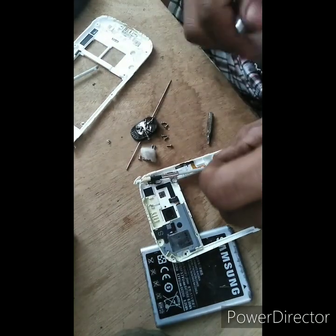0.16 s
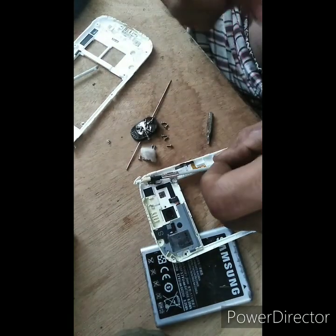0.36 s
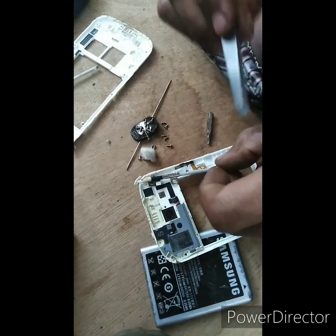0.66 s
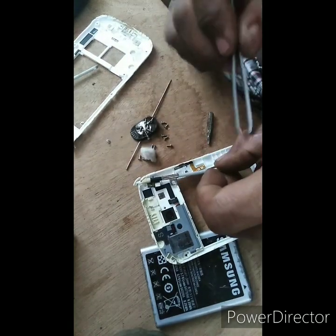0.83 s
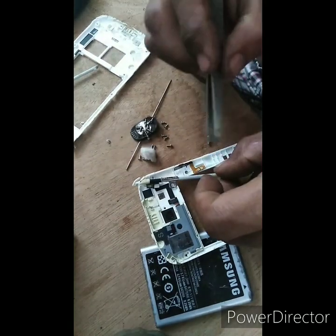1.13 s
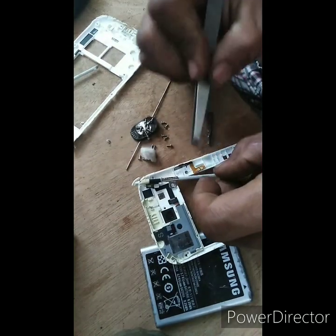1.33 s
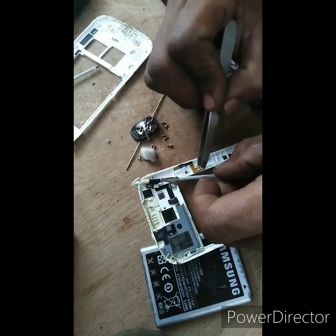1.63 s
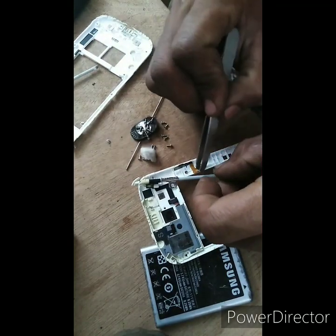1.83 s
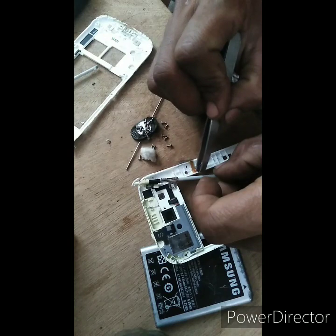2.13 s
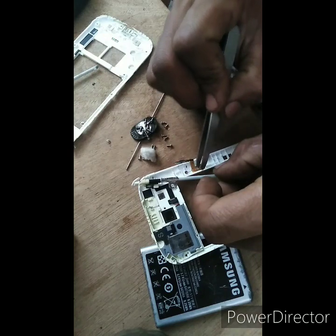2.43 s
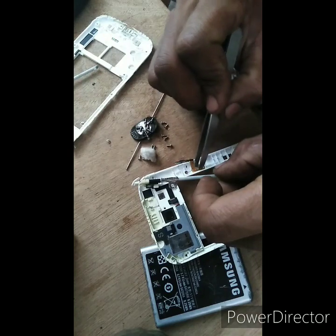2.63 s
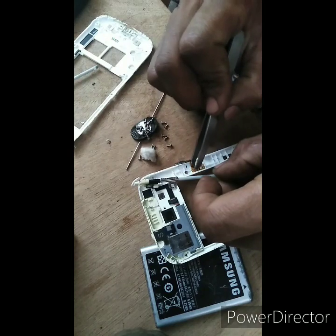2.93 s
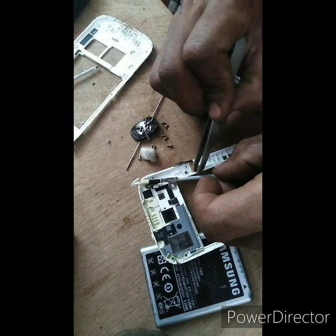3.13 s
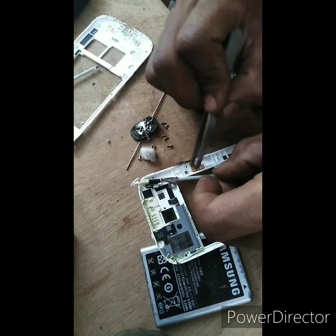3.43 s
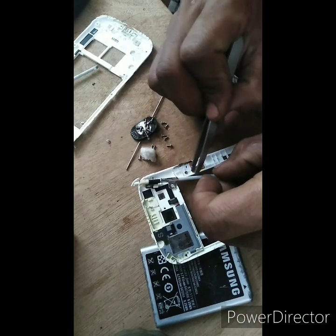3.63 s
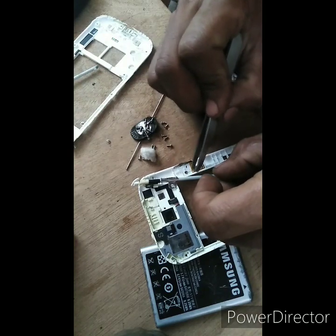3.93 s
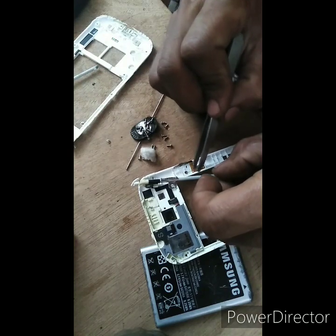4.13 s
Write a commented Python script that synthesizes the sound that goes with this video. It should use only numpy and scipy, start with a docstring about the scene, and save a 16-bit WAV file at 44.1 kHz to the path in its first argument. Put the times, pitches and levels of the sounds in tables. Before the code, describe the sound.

Small clicks, dry scrapes and a few sharp snaps of delicate phone repair in a bare room, with soft table bumps and low hum.

```python
"""In a bare, reverberant room, steel tweezers pick at small parts in a plastic phone frame on a wooden table.
Taps, scrapes and rubs are runs of tiny slips exciting small parts, plastic body and steel tips; shoves of
the frame shake the table. Short squeaks, creaks and ringing patches are narrow bands of noise; snaps are
a noise crack with decaying modes. Underneath, bumps of the hands start low rumble, fingers rub faintly, and
a motor hums with a quick throb made by neighbouring orders, over mains hum, moving air and a faint hiss."""
import sys
import numpy as np
from scipy import signal
from scipy.fft import rfft, irfft
from scipy.io import wavfile
from scipy.ndimage import uniform_filter1d

SR = 44100
rng = np.random.default_rng(int(sys.argv[2]) if len(sys.argv) > 2 else 0)


def wav_out(sig):
    """Save sig, one row per channel (or a flat mono array), as 16-bit PCM at SR to the path in sys.argv[1]."""
    wavfile.write(sys.argv[1], SR, np.round(np.clip(np.atleast_2d(sig).T, -1, 1) * 32767).astype(np.int16))


N = 187777
TIME = np.arange(N) / SR   # seconds

# Contact levels are drives, before the gains set in contacts() and the response of the room.
# Light touches of the tips. Each row: start in seconds, ring drive in dB,
# plastic body relative to it in dB, sizzle of the steel relative to it in dB.
TAPS = [(0.087, -54, -11, -0.5), (0.326, -55, -10, -3), (1.038, -52.5, -8.5, -12),
        (1.399, -51.5, -21, -9.5), (1.433, -47, -11, -8), (1.52, -57, -12, -10), (1.762, -56, -5, -3.5),
        (2.0234, -41.5, -20, -5.5), (2.143, -50.5, -25, -9.5), (2.2096, -42, -11.5, -9.5),
        (2.837, -52, -9, -15), (2.975, -49, -18, -1.5), (3.618, -51, -5, -14.5), (4.1695, -46, -10.5, -11),
        (4.201, -47.5, -9.5, -5)]
# The tips or the frame dragging. Each row: start in seconds, ring drive in dB, body drive in dB,
# sizzle drive in dB, length in seconds.
SCRAPES = [(0.0014, -58, -60.5, -68, 0.006), (0.4867, -33.5, -27, -45.5, 0.023),
           (0.588, -29.5, -26.5, -40.5, 0.013), (0.6235, -33, -28.5, -44, 0.028),
           (2.0607, -39.5, -55, -47, 0.025), (2.241, -50, -54, -55, 0.06),
           (2.336, -42.5, -55.5, -50.5, 0.018), (2.3575, -33, -44.5, -41.5, 0.022),
           (2.534, -39.5, -52, -48.5, 0.037), (2.560, -38.5, -40, -49.5, 0.022),
           (3.679, -37, -45, -48, 0.018), (3.72, -46.5, -59, -48, 0.062), (3.8616, -47, -58, -63, 0.017)]
# Fingers on smooth plastic. Each row: start in seconds, sizzle drive in dB, length in seconds.
RUBS = [(0.18, -55.5, 0.11), (0.875, -70, 0.071), (0.944, -63, 0.031), (1.9, -70, 0.018),
        (1.945, -72, 0.025), (3.132, -55, 0.085), (3.322, -52, 0.038)]
# The frame judders over the table. Each row: start in seconds, drive in dB, length in seconds.
SHOVES = [(0.492, -38, 0.016), (0.593, -37, 0.084), (0.642, -40, 0.062), (0.872, -61.5, 0.027)]
# Short pitched squeaks, creaks and ringing patches. Each row: start in seconds, centre in Hz, level in dB,
# held length in seconds, left over right in dB.
SQUEAKS = [(0.159, 992, -50.5, 0.046, -2.5), (0.326, 2280, -57, 0.018, 17),
           (0.327, 559, -59.5, 0.0097, -14), (1.055, 1303, -64, 0.015, -7), (1.148, 1117, -60, 0.0064, 19),
           (1.158, 614, -60.5, 0.0063, -29), (1.404, 2287, -61.5, 0.006, 15), (2.358, 1080, -45, 0.0062, 8),
           (2.562, 686, -62, 0.018, -27), (2.831, 3465, -67, 0.076, 24), (2.841, 1002, -57, 0.14, 2.5),
           (2.877, 1550, -61, 0.051, -13), (3.246, 1192, -57.5, 0.0026, 22), (3.339, 2097, -75, 0.055, 2),
           (3.464, 655, -68, 0.012, -13), (3.674, 938, -53.5, 0.0044, -10)]
# A part snaps into its seat. Each row: start in seconds, relative crack level in dB,
# impulse on the frame in dB, impulse on the table in dB.
SNAPS = [(0.4987, -29, -55, -68), (0.591, -27, -40, -68), (1.436, -31.5, -81, -62), (2.2888, -23, -44, -42),
         (3.748, -23.5, -33, -36.5)]
# Normal modes of the frame. Each row: frequency in Hz, gain in dB, t60 in seconds.
FRAME_MODES = [(1100, -5, 0.15), (1210, -19, 0.12)]
# Normal modes of the table under it. Each row: frequency in Hz, gain in dB, t60 in seconds.
TABLE_MODES = [(312, -4.5, 0.15), (356.5, 2, 0.11)]
# Colour of plastic and steel in contact. Each row: frequency in Hz, relative density in dB per Hz.
CONTACT_COLOUR = [(88, -35), (150, 10), (228, 25), (261, -11), (348, 12.5), (421, -33.5), (482, -16),
                  (606, -3), (1120, 12), (1610, 0.5), (2270, 2.5), (2850, 2.5), (3590, -1), (11500, -7.5),
                  (14500, -9.5)]
# Colour of the table top. Each row: frequency in Hz, relative density in dB per Hz.
TABLE_COLOUR = [(150, 0), (195, -1), (232, 3.5), (265, -2.5), (340, 7), (420, -7.5), (485, -2.5),
                (600, -11), (700, -9)]
# Stereo balance over frequency. Each row: frequency in Hz, left over right in dB.
SIDES = [(200, 5), (360, 8), (520, -12.5), (800, -6), (1130, 6), (1400, -8), (2000, -2), (4500, 2),
         (7000, 1.5), (9000, -14.5), (13500, -25)]
# How each range dies in the room. Each entry names: low edge in Hz, high edge in Hz, t60 in seconds,
# direct sound relative to the onset of the reflections in dB.
THUD = dict(low_hz=153, high_hz=662, t60=0.46, direct_db=-3)
BODY = dict(low_hz=627, high_hz=2030, t60=0.34, direct_db=5.5)
RING = dict(low_hz=1810, high_hz=5960, t60=0.28, direct_db=-5)
SIZZLE = dict(low_hz=6020, high_hz=15000, t60=0.28, direct_db=7.5)
# A hand leans or bumps on the table. Each row: start in seconds, rumble level in dB.
BUMPS = [(0.0, -46.5), (0.115, -44.5), (0.474, -51.5), (0.639, -45), (0.855, -50.5), (1.112, -42),
         (1.565, -51.5), (1.85, -50), (1.975, -47), (2.2, -53.5), (2.34, -50.5), (2.819, -51.5),
         (2.872, -47.5), (3.18, -53), (3.374, -43.5), (3.654, -52), (3.88, -48), (4.059, -46),
         (4.15, -50.5)]
# Colour of the rumble. Each row: frequency in Hz, relative density in dB per Hz.
RUMBLE_COLOUR = [(18, -92), (30, -84), (51, -12), (75, 4.5), (103, -5), (128, 0), (158, -9.5), (190, -21.5),
                 (238, -22.5), (260, -51), (340, -26), (570, -120)]
# Tones of the motor. Each row: multiple of the turning rate, mean level in dB before the hum's own level.
MOTOR_ORDERS = [(21, -64), (22, -60), (23, -67.5)]
# Colour of the air round the motor. Each row: frequency in Hz, relative density in dB per Hz.
AIR_COLOUR = [(180, -0.5), (250, -10.5), (300, 7.5), (360, 7.5), (410, 3.5), (480, -58), (600, -75.5)]
# The hum sinks away and comes back. Each row: deepest point in seconds, depth in dB,
# half width in seconds where the dip has fallen to 1/e.
HUM_DIPS = [(2.84, 19, 0.12), (3.28, 18, 0.048), (3.67, 7.5, 0.055)]
# Colour of the hiss. Each row: frequency in Hz, relative density in dB per Hz.
HISS_COLOUR = [(260, -90), (450, 0.5), (585, -2.5), (1120, -4.5), (1590, -15), (4280, -13), (4670, -7.5),
               (6710, -25), (11800, -17.5), (14500, -30)]

TAP_LENGTH_S = 0.011
TAP_SWELL, SCRAPE_SWELL, RUB_SWELL = 0.22, 0.35, 0.12   # build-up time as a share of the length
RUB_RING_DB, RUB_BODY_DB = -9, -23.5   # relative to the sizzle
TABLE_LIKENESS = 0.74   # correlation: the table top reaches both sides nearly alike
BUMP_RISE_S, BUMP_HOLD_S, BUMP_FALL_DB_PER_S = 0.022, 0.03, 70
MOTOR_HZ, MAINS_HZ = 16.4, 120   # turns per second, hum frequency
HUM_DB = -0.04
CUTOFF_HZ = 14400


def tweezers():
    """Contact excitation: taps are equally short; scrapes build up over a larger share of their length."""
    taps = []
    for s, db, body_db, sizzle_db in TAPS:
        taps.append((s, db, db + body_db, db + sizzle_db, TAP_LENGTH_S))
    tapping = contacts(taps, TAP_SWELL, ringing=0.58)
    scraping = contacts(SCRAPES, SCRAPE_SWELL, ringing=0.38)
    return tapping + scraping


def contacts(rows, swell, ringing, ring_gain_db=-10, body_gain_db=-6, sizzle_gain_db=-6,
             light_pan_db=8, firm_pan_db=3.0):
    """Forced vibration: each contact drives the small parts, the plastic body and the steel tips."""
    body, parts, tips = np.zeros(N), np.zeros((2, N)), np.zeros(N)
    for s, ring_db, body_db, sizzle_db, length in rows:
        force = slips(length, swell)
        # a light touch rings more and lies to the left; a firm one is damped and nearer the middle
        firmness = np.clip((ring_db + 55) / 25, 0, 1)
        rung = small_part(force, ringing * (1 - 0.24 * firmness))
        pan_db = light_pan_db + firmness * (firm_pan_db - light_pan_db)
        add(parts, s, from_db(ring_db + ring_gain_db) * panned(pan_db) * rung)
        add(body, s, from_db(body_db + body_gain_db) * force)
        add(tips, s, from_db(sizzle_db + sizzle_gain_db) * rung)
    body_sound = in_room(body, CONTACT_COLOUR, **BODY)
    parts_sound = in_room(parts, CONTACT_COLOUR, sides=None, **RING)   # already panned
    tips_sound = in_room(tips, CONTACT_COLOUR, **SIZZLE)
    return body_sound + parts_sound + tips_sound


def slips(length, swell, per_s=2200, spread_db=1.0, catch_db=5.5, size=8192):
    """Stick-slip friction: a run of tiny slips, in uneven clumps, builds up and fades; energy 1."""
    t, length = np.arange(size) / SR, max(length, 1e-3)
    signs = rng.choice([-1, 1], size)
    sizes = from_db(spread_db * np.clip(rng.standard_normal(size), -2, 2)) * signs
    clumps = from_db(catch_db * drift(222.0, size))
    grains = (rng.random(size) < per_s / SR) * sizes * clumps
    grains[1] = 1   # at least one slip
    build_up = 1 - np.exp(-t / (swell * length))
    grains = grains * np.exp(-(t / length) ** 2) * build_up
    return grains / np.linalg.norm(grains)


def small_part(force, share, t60=0.0055, count=17):
    """Modal resonance: every touch meets another spot with its own short modes across the treble."""
    t, share = np.arange(2048) / SR, np.clip(share, 0, 1)
    hz = np.geomspace(1900, 13500, count) * from_db(rng.uniform(-0.49, 0.46, count))
    gains = np.sqrt(hz) * rng.choice([-1, 1], count)
    modes = gains @ np.sin(2 * np.pi * np.outer(hz, t)) * np.exp(-np.log(1000) * t / t60)
    rung = signal.fftconvolve(force, modes)[:len(force)]
    rung = rung / np.linalg.norm(rung)
    return np.sqrt(1 - share) * force + np.sqrt(share) * rung


def in_room(force, colour, low_hz, high_hz, t60, direct_db, sides=SIDES, alike=0.021, size=32768):
    """Reverberation: the force meets a brief direct response, then dense reflections dying exponentially."""
    t = np.arange(size) / SR
    reflections = np.exp(-np.log(1000) * t / t60)
    direct = from_db(direct_db) * np.exp(-t / 0.0021)
    response = noise(colour, size, alike, sides, low_hz, high_hz) * (reflections + direct)
    response = rms_one(response) * np.sqrt(0.07 * SR / size)   # the same energy for any decay
    return signal.fftconvolve(force * np.ones((2, 1)), response, axes=1)[:, :N]


def snaps(crack_s=0.002, thump_delay=0.0043, room_db=-20, size=1024):
    """Impulse response: a dry crack, the frame's ring, then the table's thump, with a little room."""
    crack, frame, table = np.zeros((2, N)), np.zeros(N), np.zeros(N)
    crack_colour = [(1000, 6.5), (5000, 9.2), (12000, 30.0)]   # (Hz, relative dB per Hz)
    for s, crack_db, frame_db, thump_db in SNAPS:
        fade = np.exp(-np.arange(size) / SR / crack_s)
        burst = noise(crack_colour, size, 1.0, SIDES, low_hz=894) * fade
        add(crack, s, from_db(crack_db - 13.5) * burst)
        add(frame, s, from_db([frame_db]))
        add(table, s + thump_delay, from_db([thump_db]))
    room = in_room(frame, CONTACT_COLOUR, low_hz=248, high_hz=1500, t60=0.23, direct_db=-6.0)
    ringing = ring(frame, FRAME_MODES) + ring(table, TABLE_MODES)
    return crack + from_db(room_db) * room + panned(30.0) * ringing   # modes far left


def ring(clicks, modes):
    """Damped free vibration: each click sets every mode ringing."""
    out = 0
    for hz, db, t60 in modes:
        radius, w = from_db(-60 / (t60 * SR)), 2 * np.pi * hz / SR   # decay and phase per sample
        feedback = [1, -2 * radius * np.cos(w), radius * radius]
        out = out + from_db(db) * signal.lfilter([0, np.sin(w)], feedback, clicks + 1e-18)
    return out


def squeaks(t60=0.28, width_hz=30, rise_s=0.00067, size=22050):
    """Band-pass filtering: narrow noise at one pitch, held briefly, then dying away exponentially."""
    out, t = np.zeros((2, N)), np.arange(size) / SR
    for s, hz, db, length, pan_db in SQUEAKS:
        dying = np.exp(-np.log(1000) * np.maximum(t - length, 0) / t60)
        shape = (1 - np.exp(-t / rise_s)) * dying
        half_width = width_hz * np.sqrt(hz / 1000)   # width_hz holds at 1 kHz
        band = signal.butter(2, [hz - half_width, hz + half_width], "band", fs=SR, output="sos")
        tone = signal.sosfilt(band, rng.standard_normal((2, 2 * size)))[:, size:]   # settled half
        add(out, s, from_db(db) * panned(pan_db) * shape * rms_one(tone))
    return out


def shoves():
    """Structure-borne sound: the slips of the sliding frame shake the table top."""
    force = np.zeros(N)
    for s, db, length in SHOVES:
        add(force, s, from_db(db) * slips(length, swell=0.034))
    return in_room(force, TABLE_COLOUR, alike=TABLE_LIKENESS, **THUD)


def rubs():
    """Soft friction: skin on plastic is mostly sizzle and barely stirs the parts and the body."""
    rows = [(s, db + RUB_RING_DB, db + RUB_BODY_DB, db, length) for s, db, length in RUBS]
    return contacts(rows, RUB_SWELL, ringing=0.63)


def fidgets(level_db=-78, spread_db=-4.5, count=48):
    """Scattered friction: fingers shift their grip in faint, soft rubs, each with its own ring."""
    force = np.zeros(N)
    for k, (when, softness) in enumerate(rng.uniform(0, 1, (count, 2))):
        rub = small_part(slips(0.025, swell=0.6), 0.95)
        s = (k + when) / count * N / SR   # one at random in each equal slot
        add(force, s, from_db(level_db + spread_db * (2 * softness - 0.5)) * rub)
    return in_room(force, CONTACT_COLOUR, low_hz=800, high_hz=12000, t60=0.25, direct_db=-10)


def hands():
    """Addition of powers: each bump starts a low rumble that rises, holds and dies at a steady rate."""
    rumble = noise(RUMBLE_COLOUR, alike=0.98, low_hz=42.5)
    local_power = uniform_filter1d(np.mean(rumble ** 2, axis=0), size=4000)
    rumble = rumble / np.sqrt(local_power)   # evens out its own swells
    power = 0
    for s, db in BUMPS:
        rise = np.clip((TIME - s) / BUMP_RISE_S, 0, 1)
        fall_db = BUMP_FALL_DB_PER_S * np.maximum(TIME - s - BUMP_RISE_S - BUMP_HOLD_S, 0)
        power = power + (rise * from_db(db - fall_db)) ** 2
    return panned(2.9) * rumble * np.sqrt(power)


def hum():
    """Beats: neighbouring motor orders throb once a turn, over mains hum and moving air."""
    turns = MOTOR_HZ * (TIME - 0.045) + 0.0095 * drift(1.9)   # slightly unsteady rotation
    motor = 0
    for order, db in MOTOR_ORDERS:
        level = from_db(db + 3.07 * drift(5.1))
        motor = motor + level * np.sqrt(2) * np.cos(2 * np.pi * order * turns)
    mains = from_db(-68.0) * np.sqrt(2) * np.sin(2 * np.pi * MAINS_HZ * TIME)
    air = from_db(-64) * noise(AIR_COLOUR, alike=0.61)
    dip_db = sum(depth_db * np.exp(-((TIME - s) / width) ** 2) for s, depth_db, width in HUM_DIPS)
    return from_db(HUM_DB - dip_db) * (panned(33.0) * motor + panned(13.8) * air + panned(3.5) * mains)


def hiss():
    """Stationary random noise: a faint, wide hiss."""
    return from_db(-78.0) * noise(HISS_COLOUR, alike=0.045, low_hz=370) * panned(0.58)


def noise(spectrum, size=N, alike=0.0, sides=None, low_hz=20, high_hz=16000):
    """Spectral shaping: stereo noise of a given colour, left-right correlation and balance; rms 1."""
    hz, alike = np.arange(size // 2 + 1) * SR / size, np.clip(alike, -1, 1)
    mid, side = rfft(rng.standard_normal((2, size)))
    both = np.sqrt(1 + alike) * mid + np.sqrt(1 - alike) * side * [[1], [-1]]
    edges = 1 / np.sqrt((1 + (low_hz / (hz + 1)) ** 16) * (1 + (hz / high_hz) ** 16))
    balance = 1 if sides is None else panned(at_hz(sides, hz))
    return rms_one(irfft(both * edges * balance * from_db(at_hz(spectrum, hz)), size))


def drift(rate, size=N):
    """Random modulation: normal random values, rate of them per second, joined by straight lines."""
    return np.interp(np.arange(size) / SR * rate, np.arange(4096), rng.standard_normal(4096))


def at_hz(points, hz):
    """Logarithmic frequency scale: read a table in dB between its points."""
    f, value = np.transpose(points)
    return np.interp(np.log(hz + 1), np.log(f), value)


def panned(pan_db):
    """Constant power: left and right gains for a left-over-right level in dB."""
    return np.sqrt(2 / (1 + from_db(np.outer([-2, 2], pan_db))))


def from_db(db):
    """Logarithmic level: decibels to amplitude gain."""
    return 10 ** (np.asarray(db) / 20)


def rms_one(x):
    """Mean-square normalisation: scale to rms 1."""
    return x / np.sqrt(np.mean(x ** 2) + 1e-20)


def add(track, s, sound):
    """Superposition: mix a sound into a track at a time in seconds."""
    start = int(np.clip(s * SR, 0, N - 1))
    track[..., start:start + sound.shape[-1]] += sound[..., :N - start]


def scene():
    """Superposition of the handwork, the hum and a faint hiss."""
    handwork = tweezers() + snaps() + squeaks() + shoves() + rubs() + fidgets() + hands()
    return handwork + hum() + hiss()


def record(dry):
    """Low-pass filtering: the top is cut steeply."""
    return signal.sosfilt(signal.ellip(10, 0.2, 70, CUTOFF_HZ, fs=SR, output="sos"), dry)


dry = scene()
out = record(dry)
wav_out(out)
```